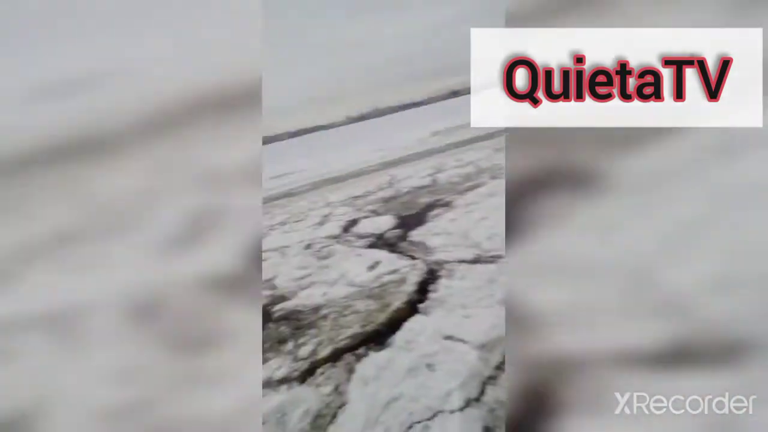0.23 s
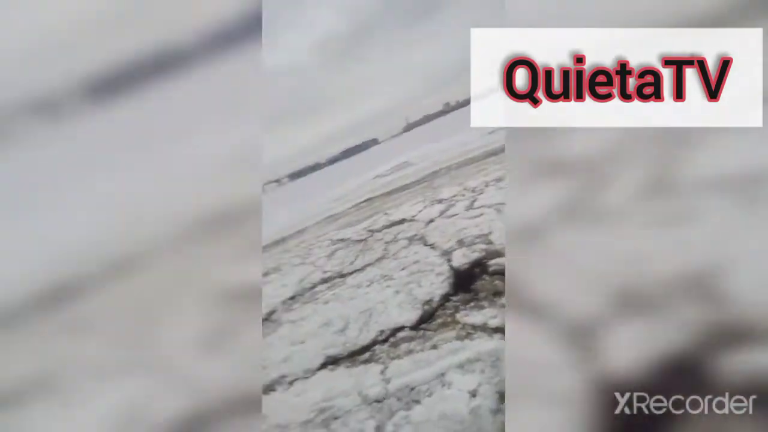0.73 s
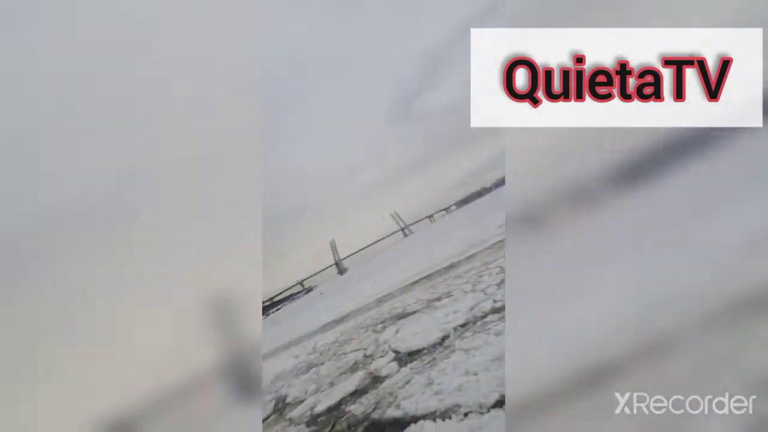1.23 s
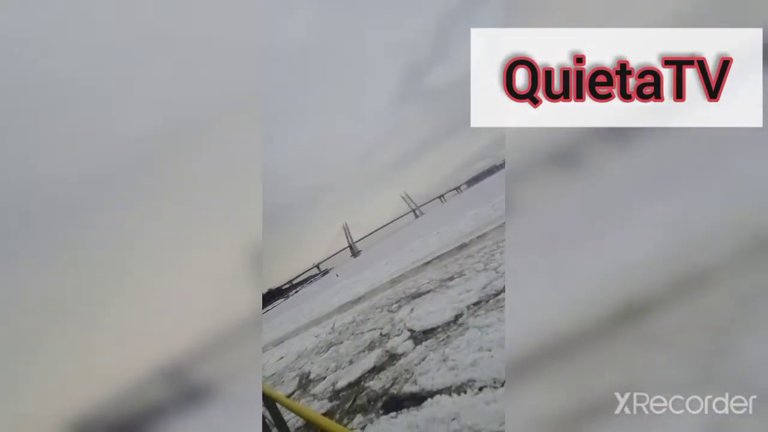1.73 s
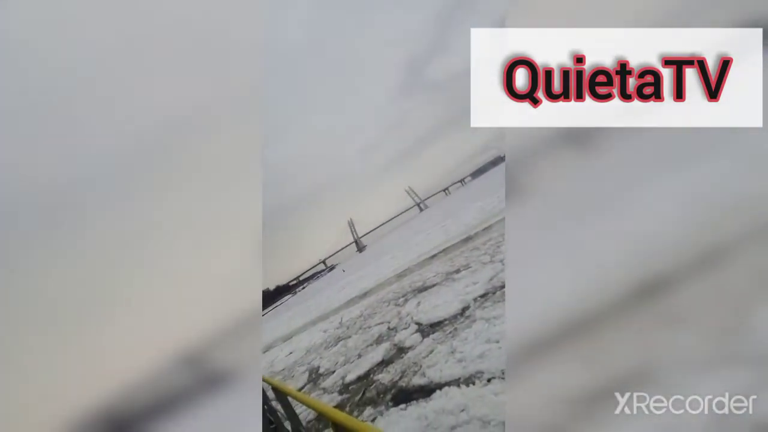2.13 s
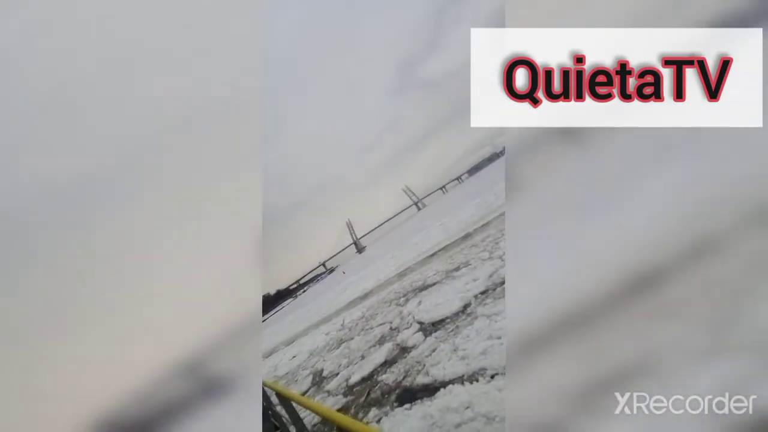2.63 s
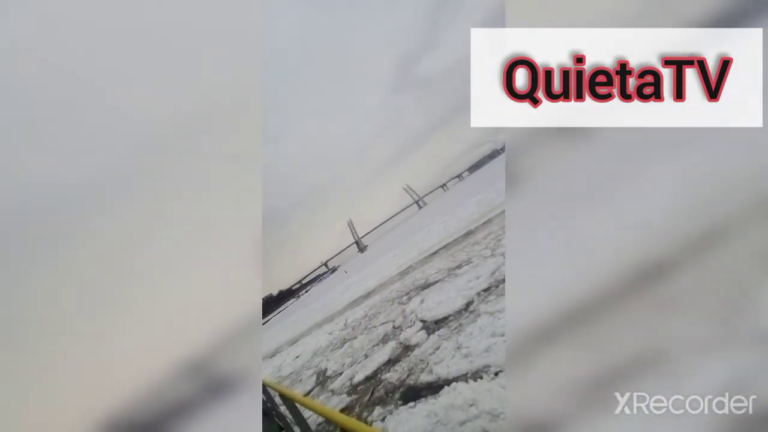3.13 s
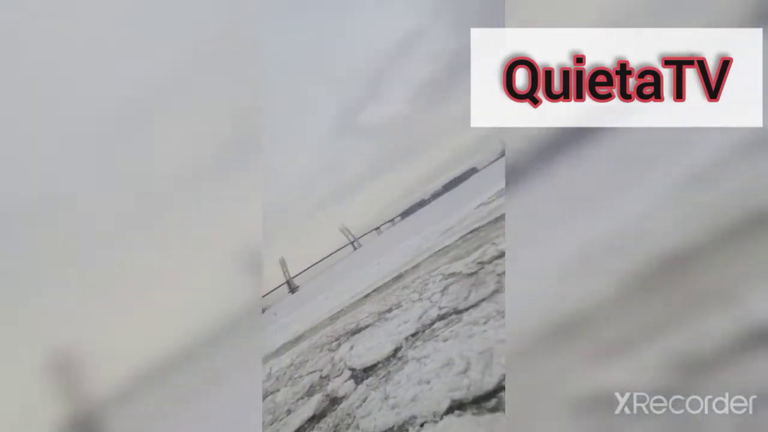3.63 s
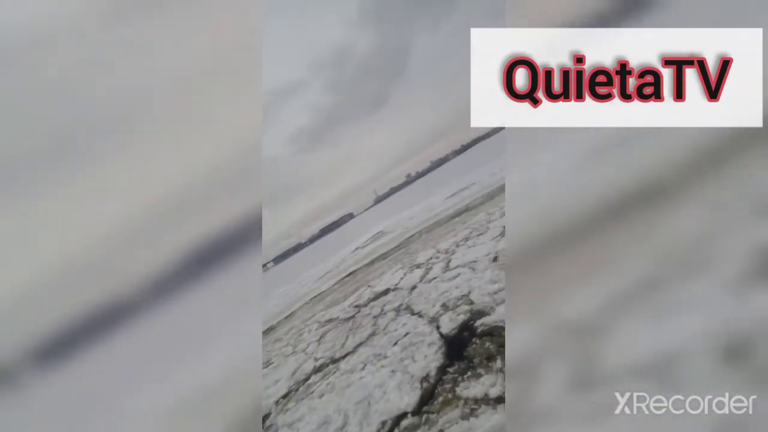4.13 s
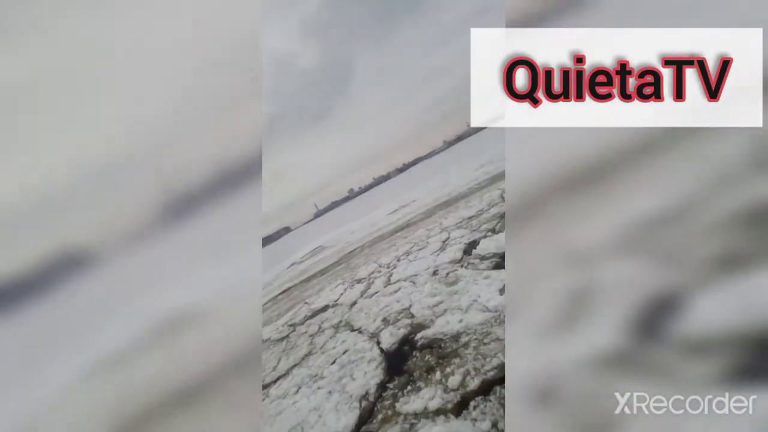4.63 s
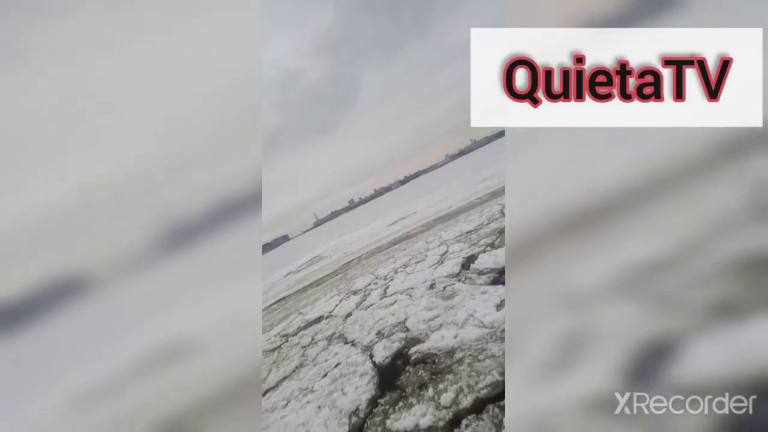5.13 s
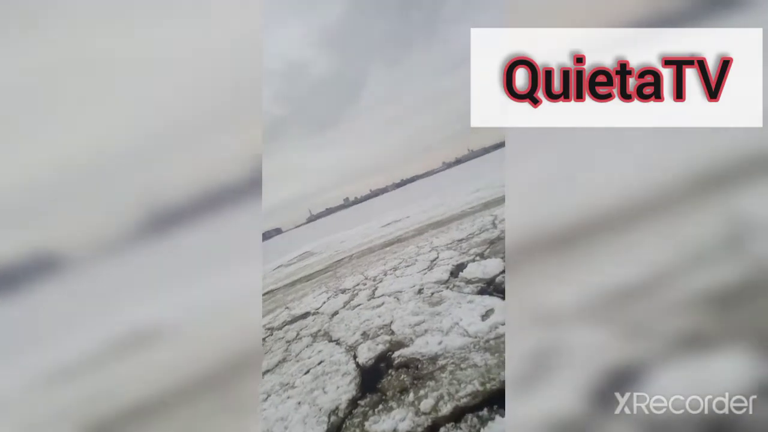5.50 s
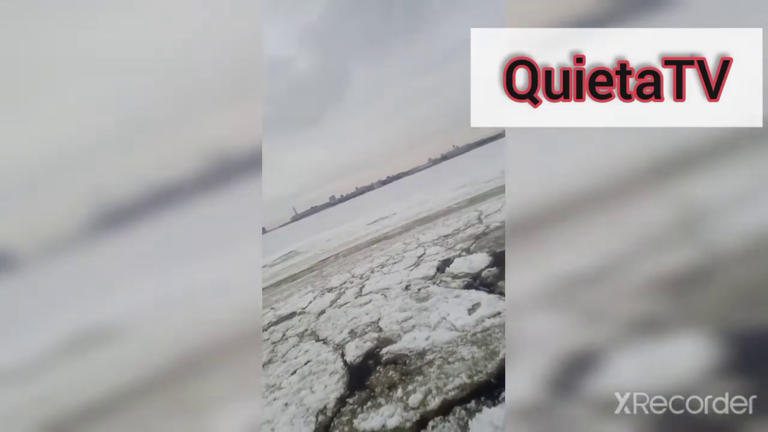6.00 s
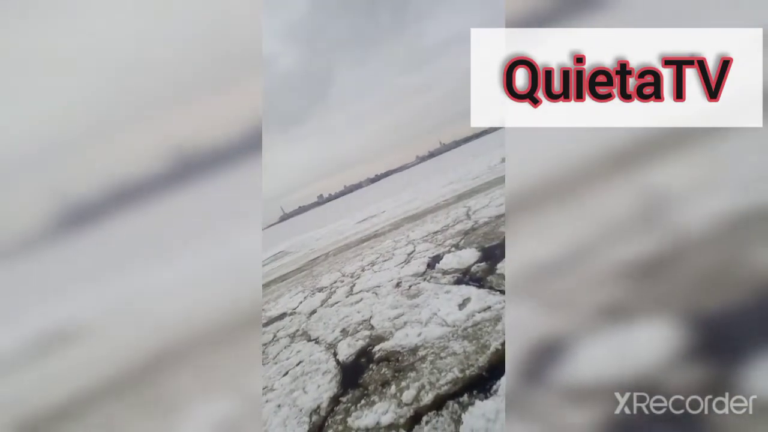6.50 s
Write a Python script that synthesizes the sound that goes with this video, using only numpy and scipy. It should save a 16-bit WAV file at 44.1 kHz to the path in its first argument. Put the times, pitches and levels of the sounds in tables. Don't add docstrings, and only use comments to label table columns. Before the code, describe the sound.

The sound opens with a tiny bright click and swells to full level within 0.4 seconds: a large ship's diesel heard on deck, already running and never changing speed. Its deep, dense drone repeats about six times a second, with lumpy firings inside each cycle, shaking hull and funnel. A broad, dull roar of exhaust and water wash surrounds it, with faint whines and hiss. A thin panel hum swells at 0.1-1.6, briefly around 2.3 and 3.4, and again from 5.3. A loose fitting buzzes lightly and ticks dry and high, sparse in the middle, busier after 4.2 and liveliest from 5.7 to 6.4. Air puffs come faintly at 0.3, sharply at 1.4, softly at 2.8, then fuller at 5.3 and 6.5. The turning phone makes the tone brightest near 1.4, dullest around 4.8. It stops with the engine still running.

```python
import sys
import numpy as np
from scipy import signal
from scipy.fft import rfft, irfft
from scipy.io import wavfile
from scipy.ndimage import uniform_filter1d, map_coordinates

SR = 44100
rng = np.random.default_rng(int(sys.argv[2]) if len(sys.argv) > 2 else 0)


def level_to_linear(level):
    exponent = np.asarray(level, float) / 20
    return 10 ** exponent


def inscribe(sig):
    pcm = np.round(np.clip(np.atleast_2d(sig).T, -1, 1) * 32767)
    wavfile.write(sys.argv[1], SR, pcm.astype(np.int16))


N = 298116
T = np.arange(N) / SR

# pitch in Hz, level in dB per Hz.
RUMBLE_SPECTRUM = [(20, -92), (33, -63), (55, -60), (72, -53), (135, -51), (170, -58), (230, -56),
                   (450, -58)]
# pitch in Hz, level in dB per Hz.
WASH_SPECTRUM = [(450, -58), (900, -59.5), (1080, -63.5), (1150, -64.5), (2000, -77), (3000, -88.5),
                 (4500, -99), (7000, -116)]
# pitch in Hz, level in dB per Hz.
HISS_SPECTRUM = [(2500, -90), (4000, -99), (5500, -100), (8000, -104), (10000, -107), (13000, -111),
                 (16000, -114)]
# pitch in Hz, width in Hz, level in dB rms.
PANEL_MODES = [(330, 24, -43), (392, 14, -46), (1054, 14, -52)]
# pitch in Hz, level in dB rms.
WHINE_TONES = [(261, -43), (1936, -66.5), (3616, -75.5), (3688, -75.5)]
# start in seconds, length in seconds, level in dB rms.
HUM_SWELLS = [
    (.1, 1.5, -37),
    (2.25, .3, -37),
    (3.3, .4, -39),
    (5.3, 1.5, -38.5),
]
HUM_MULTIPLE = 107
HUM_REST_DB, HUM_SLOPE_DB_PER_S = -45, 50

# peak time in seconds, level in dB, release in dB per second,
# fullness in dB moved from top to bottom.
AIR_PUFFS = [
    (.316, -70, 40, -4),
    (1.372, -54.5, 90, -5),
    (2.81, -67, 55, -5),
    (5.3, -57.5, 75, 2),
    (6.52, -58, 72, 6),
]
# pitch in Hz, level in dB per Hz before scaling.
AIR_SPECTRUM = [(3500, -16), (5000, -4), (7500, 0), (9500, -2.5), (12000, -4), (14000, -7), (16000, -10)]
OPEN_DB_PER_S, HOLD_S = 280, .045

# time in seconds, throb in dB.
SHAKE_STRENGTH = [(0, 1.5), (.8, .8), (3.7, .8), (4.2, 3), (6.4, 3), (6.76, 1.5)]
SHAKE_HZ, SHAKE_START_S = 14.02, .0558
# pitch in Hz, width in Hz, level in dB rms, place in the shake from 0 to 1.
BUZZ_MODES = [(7340, 790, -67, .3), (8470, 530, -68, 0.9), (9240, 370, -82, .85), (4300, 450, -71, .3),
              (3560, 500, -66.5, 0.2)]
# time in seconds, peak in dB, pitch in Hz.
BODY_TICKS = [(.0558, -44, 7100), (.1989, -45, 7060), (.3411, -44, 7140), (.414, -45, 7200),
              (.6995, -47, 7120), (.9862, -52, 7140), (1.3648, -45, 7420), (2.055, -40, 7060),
              (2.8923, -50, 7470), (2.9183, -47, 7340), (3.7978, -47, 7300), (4.2273, -47, 7700),
              (4.2975, -51, 7600), (4.701, -49, 7500), (4.7965, -47, 7400), (4.8698, -46, 7400),
              (5.226, -43, 7330), (5.2984, -46, 7510), (5.4186, -47, 7040), (5.4899, -47, 7200),
              (5.7049, -42, 7150), (5.7758, -50, 7690), (5.7982, -46, 7700), (5.8476, -50, 7360),
              (5.8691, -44, 7100), (5.9199, -38.5, 7200), (5.9918, -39, 7200), (6.2053, -42.5, 7150),
              (6.2282, -41, 7340), (6.348, -40, 7150)]
# time in seconds, peak in dB, pitch in Hz.
CAP_TICKS = [(1.3683, -48, 8530), (1.4182, -46, 9500), (1.8432, -50, 9430), (2.4164, -47, 9370),
             (2.7696, -47, 9500), (4.368, -52, 8470), (4.985, -50, 8900), (5.0519, -51, 8500),
             (5.4894, -51, 8590), (5.5515, -48, 8230), (5.7698, -51, 8410), (5.8371, -50, 8570),
             (6.0132, -47, 8300), (6.5221, -50, 9290), (6.536, -55, 8440)]
# pitch in Hz, peak in dB, share of thirds per dB of throb.
FAINT_TICKS = [(7320, -54.5, 0.2), (8480, -59, .04), (9300, -59, .02)]

# time in seconds, cycles per second.
ENGINE_SPEED = [(0, 5.996), (1.1, 5.996), (2.3, 5.992), (3.8, 5.990), (5.3, 5.992), (6.5, 5.996)]
# place in the cycle from 0 to 1, strength in dB.
FIRINGS = [(0.0189, 1.9), (0.0396, -0.2), (0.1038, -4.5), (0.3286, 5.4), (0.3862, 0.0), (0.4347, -1.4),
           (0.5439, -6.7), (0.6074, 0.5), (0.6727, -5.0), (0.8166, 3.4), (0.8331, 3.0), (0.9212, -3.9)]
# place in the cycle
# from 0 to 1, strength in dB.
HULL_FIRINGS = [(0.0274, 3.1), (0.1457, 0.3), (0.2554, -0.9), (0.3033, -0.3), (0.3468, 4.1), (0.48, 2.6),
                (0.6111, -1.6), (0.659, 0.5), (0.8166, -3.2), (0.8686, -0.9), (0.915, 0.3), (0.9776, -1.1)]
PULSE_LAG = .77
# multiple of the
# cycle, level in dB rms.
STRONG_NOTES = [(10, -40), (12, -24), (13, -29), (15, -35), (16, -39), (17, -33), (18, -27), (19, -37),
                (21, -37), (22, -38), (23, -30), (24, -38), (25, -37), (30, -36.5), (32, -40), (33, -38),
                (34, -39), (35, -40), (37, -38), (38, -36.5), (40, -38), (43, -37), (44, -43), (45, -38),
                (47, -41), (48, -37), (52, -34),
                (53, -43), (54, -43), (56, -38), (59, -44), (60, -44), (65, -39), (67, -45), (70, -45),
                 (71, -44), (72, -40), (73, -38), (84, -39), (121, -48), (141, -48)]
# pitch in Hz, level of one multiple in dB rms.
FAINT_NOTES = [(29, -55), (35, -42), (150, -43), (162, -49), (186, -45), (235, -44), (250, -48), (309, -48)]
# pitch in Hz, level of one multiple in dB rms.
CLATTER_SPECTRUM = [(310, -46), (450, -49), (620, -52), (800, -55), (1050, -56.5), (1150, -63), (1400, -73),
                    (1800, -81)]
# multiple of the cycle, change in dB.
TURNED_NOTES = [(32, -7), (37, -11), (38, -9), (40, 3), (45, -10), (47, -8), (52, -4), (56, -3), (59, 6),
                (65, -6), (72, -5), (73, 1.5)]
TURN_S = 3.9

# time in seconds, facing from 0 (away) to 1 (towards).
PHONE_FACING = [(0, 0.18), (.55, 0.57), (1.4, 1), (3.45, 0.65), (4.8, 0), (6.76, 0.18)]
FACING_BASS_DB, FACING_MIDDLE_DB, FACING_TREBLE_DB = -0.46, 0.76, 4
FADE_DB, FADE_S, CLICK_DB, CLICK_S = -10.5, 0.42, 18, 0.0051


def shape(points, hz):
    at, db = np.transpose(points)
    return level_to_linear(np.interp(np.log(hz + 1e-9), np.log(at), db, left=-200, right=-200))


def noise(points):
    white = rfft(rng.standard_normal(N)) * np.sqrt(SR / 2)
    return irfft(white * shape(points, np.fft.rfftfreq(N, 1 / SR)), N)


def ring(x, hz, width, count=1):
    for _ in range(count):
        x = signal.lfilter(*signal.iirpeak(hz, hz / width, fs=SR), x)
    return x / np.std(x)


def walk(rate):
    k = int(SR / rate)
    steps = np.repeat(rng.standard_normal(N // k + 1), k)
    return 1.3 * uniform_filter1d(uniform_filter1d(steps, k), k)[:N]


def split(x, low_hz, high_hz):
    bass = signal.sosfiltfilt(signal.butter(2, low_hz, fs=SR, output="sos"), x)
    treble = signal.sosfiltfilt(signal.butter(2, high_hz, "high", fs=SR, output="sos"), x)
    return bass, x - bass - treble, treble


def roar(turns):
    bass, middle, treble = split(noise(RUMBLE_SPECTRUM) + noise(WASH_SPECTRUM), 400, 1500)
    beat = 1 + .12 * np.cos(2 * np.pi * 8 * turns) + .08 * np.cos(2 * np.pi * turns)
    upper = middle * level_to_linear(.6 * walk(7)) + treble * level_to_linear(.6 * walk(9))
    return bass * level_to_linear(.8 * walk(5)) + beat * upper


def panels():
    out = 0
    for hz, width, db in PANEL_MODES:
        out = out + level_to_linear(db + 2.0 * walk(2)) * ring(rng.standard_normal(N), hz, width)
    return out


def hum(turns):
    db = HUM_REST_DB
    for start, length, top_db in HUM_SWELLS:
        away_s = np.maximum(0, np.maximum(start - T, T - start - length))
        db = np.maximum(db, top_db - HUM_SLOPE_DB_PER_S * away_s)
    return level_to_linear(db + 3 + 1.5 * walk(9)) * np.sin(2 * np.pi * HUM_MULTIPLE * turns + 1.3 * walk(9))


def whines():
    out = 0
    for hz, db in WHINE_TONES:
        waver = min(hz / 1300, 1.5) * walk(8)
        out = out + level_to_linear(db + 3 + 1.5 * walk(3)) * np.sin(2 * np.pi * hz * T + waver)
    return out


def hiss():
    return noise(HISS_SPECTRUM) * level_to_linear(0.43 * walk(6.6))


def valve():
    low, middle, high = split(noise(AIR_SPECTRUM) * level_to_linear(-33 + 1.2 * walk(40)), 7000, 11000)
    out = 0
    for s, db, release_db, full_db in AIR_PUFFS:
        opening_db = OPEN_DB_PER_S * np.maximum(s - T, 0)
        closing_db = release_db * np.maximum(T - s - HOLD_S, 0)
        air = level_to_linear(full_db) * low + level_to_linear(.3 * full_db) * middle + level_to_linear(-.6 * full_db) * high
        out = out + level_to_linear(db - opening_db - closing_db) * air
    return out


def buzz():
    shake_db = np.interp(T, *np.transpose(SHAKE_STRENGTH))
    out = 0
    for hz, width, db, place in BUZZ_MODES:
        beat = 2 * np.pi * (SHAKE_HZ * T - place)
        knocks = rng.standard_normal(N) * level_to_linear(2.0 * rng.exponential(size=N))
        throb_db = shake_db * (np.cos(beat) + .7 * np.cos(3 * beat))
        level_db = db + 1.1 * walk(5) + (hz > 8000) * .8 * (1.5 - shake_db)
        out = out + level_to_linear(level_db) * ring(knocks * level_to_linear(throb_db), hz, width, count=2)
    return out


def chatter():
    thirds = np.arange(SHAKE_START_S, T[-1], 1 / 3 / SHAKE_HZ)
    shake_db = np.interp(thirds, *np.transpose(SHAKE_STRENGTH))
    rows = []
    for hz, db, share in FAINT_TICKS:
        hit = rng.random(len(thirds)) < share * (1 + shake_db)
        jitter, size, tune = rng.standard_normal((3, len(thirds)))
        ticks = np.transpose([thirds + .002 * jitter, db + 2.5 * size, hz * (1 + .02 * tune)])
        rows += ticks[hit].tolist()
    return rows


def fitting():
    out = buzz()
    t = np.arange(2600) / SR
    swell = (1 - np.exp(-t / .0007)) * np.exp(-t / .008)
    for s, db, hz in BODY_TICKS + CAP_TICKS + chatter():
        body, edge = rng.standard_normal((2, len(t)))
        overtone = level_to_linear(-26) * ring(edge, min(2.01 * hz, 15000), 1200, count=2)
        tick = swell * (ring(body, hz, 540, count=2) + overtone)
        at = int(s * SR)
        out[at:at + len(t)] += (level_to_linear(db - 0.8) * tick / np.abs(tick).max())[:N - at]
    return out


def timing(pattern, multiple):
    place, strength_db = np.transpose(pattern)
    return np.angle(np.exp(-2j * np.pi * multiple * place) @ level_to_linear(strength_db)) - PULSE_LAG


def cycle_notes(k):
    cycle_hz = ENGINE_SPEED[0][1]
    uneven = level_to_linear(3 * rng.standard_normal(len(k)).clip(-2, 1.5))
    scatter = uneven * np.exp(2j * np.pi * rng.random(len(k)))
    notes = shape(CLATTER_SPECTRUM, k * cycle_hz) * scatter
    faint = [(m, 20 * np.log10(shape(FAINT_NOTES, m * cycle_hz))) for m in np.arange(5, 52)]
    for multiple, db in faint + STRONG_NOTES:
        pattern = FIRINGS if multiple < 30 else HULL_FIRINGS
        notes[multiple] = level_to_linear(db) * np.exp(1j * timing(pattern, multiple))
    return notes


def engine(turns, size=8192, count=7):
    k = np.arange(size // 2 + 1)
    real, imaginary = rng.standard_normal((2, count, len(k)))
    chance = (real + 1j * imaginary) / np.sqrt(2)
    notes = np.tile(cycle_notes(k), (count, 1))
    after_turn = np.linspace(0, T[-1], count) > TURN_S
    for multiple, db in TURNED_NOTES:
        notes[after_turn, multiple] *= level_to_linear(db)
    drift = np.clip(k / 280, 0, .6)
    changing = notes * (np.sqrt(1 - drift ** 2) + 1.2 * drift * chance)
    cycles = irfft(changing, size) * size / np.sqrt(2)
    where = [T / T[-1] * (count - 1), turns % 1 * size]
    return map_coordinates(cycles, where, order=1, mode="grid-wrap")


def swung_phone(x):
    facing = np.interp(T, *np.transpose(PHONE_FACING)) - .5
    opening = level_to_linear(FADE_DB * (1 - np.clip(T / FADE_S, 0, 1) ** 0.78))
    bass, middle, treble = split(x, 550, 1700)
    treble_db = FACING_TREBLE_DB * facing + CLICK_DB * np.exp(-T / CLICK_S)
    near = level_to_linear(FACING_BASS_DB * facing) * bass + level_to_linear(FACING_MIDDLE_DB * facing) * middle
    return opening * (near + level_to_linear(treble_db) * treble)


def scene():
    turns = np.cumsum(np.interp(T, *np.transpose(ENGINE_SPEED))) / SR
    rumble = roar(turns) + panels() + hum(turns) + whines() + hiss()
    ship = swung_phone(engine(turns) + rumble)
    fitting_fade = np.interp(T, [0, .42], [.4, 1])
    return (ship + fitting_fade * fitting() + valve())[None]


def roll_off(x):
    return signal.sosfilt(signal.butter(12, 15720, fs=SR, output="sos"), x)


def record(dry):
    return roll_off(dry)


dry = scene()
out = record(dry)
inscribe(out)
```